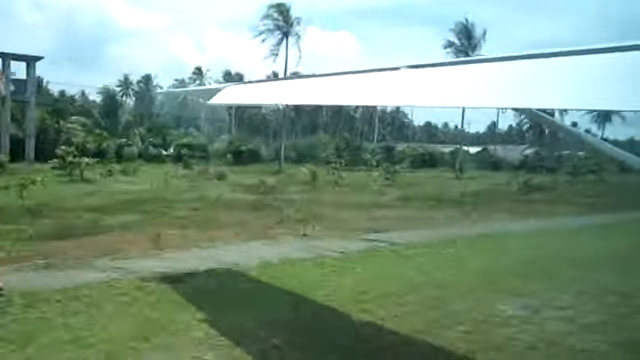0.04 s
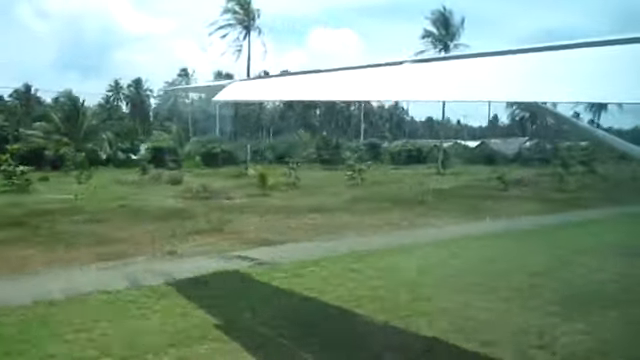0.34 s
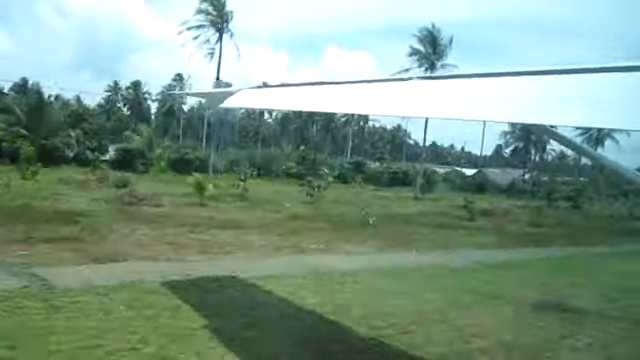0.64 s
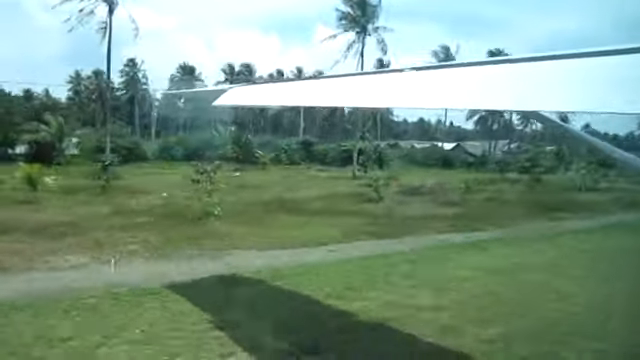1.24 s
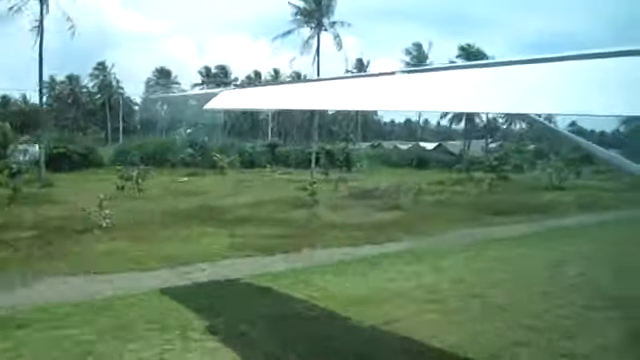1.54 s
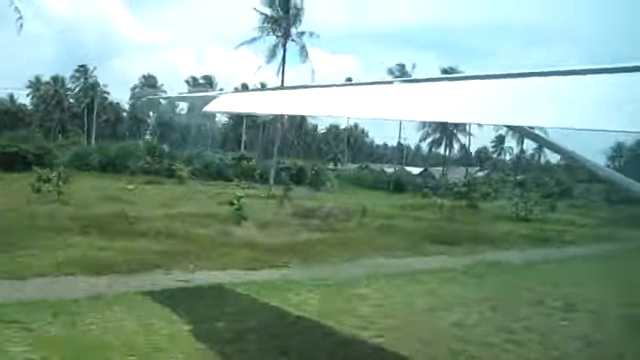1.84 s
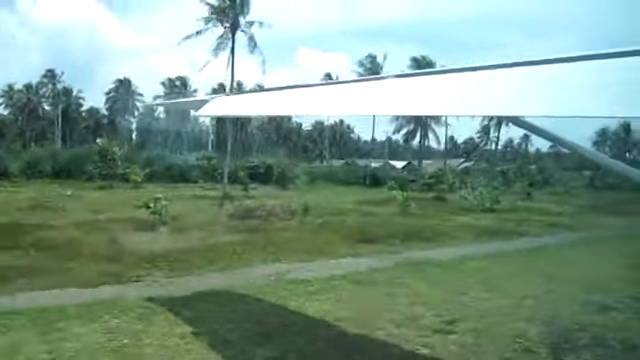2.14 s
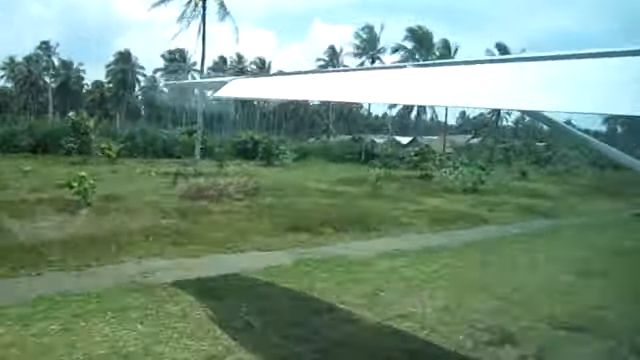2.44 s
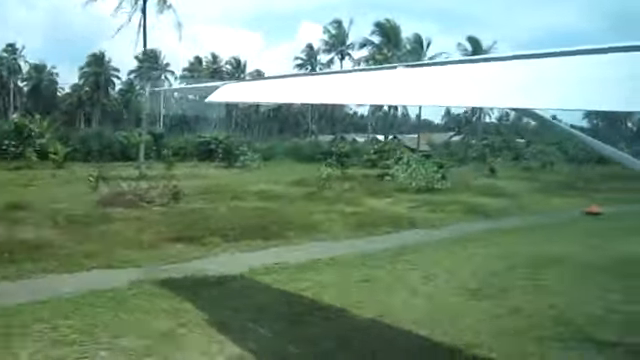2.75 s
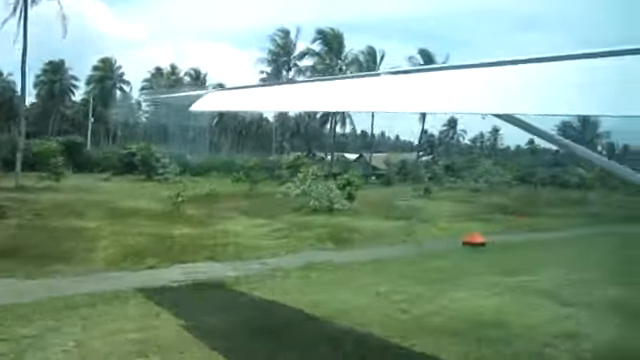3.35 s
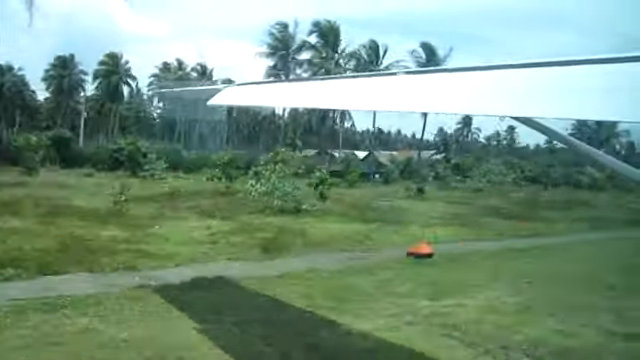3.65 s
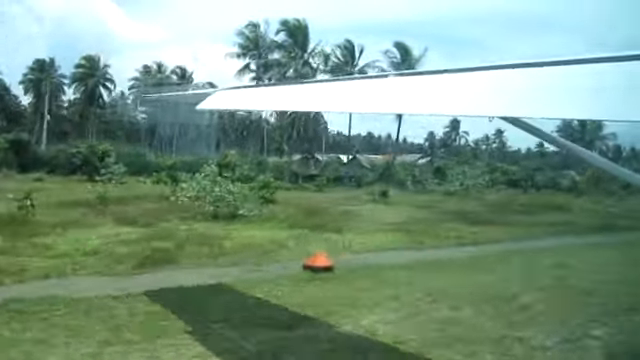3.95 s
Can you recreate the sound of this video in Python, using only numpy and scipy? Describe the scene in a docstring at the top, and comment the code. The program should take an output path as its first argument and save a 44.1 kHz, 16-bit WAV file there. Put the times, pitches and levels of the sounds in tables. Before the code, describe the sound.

Light aircraft engine drones inside the cabin, with wheel rumble, rushing air and bumps.

```python
"""Cabin of a light aircraft rolling along a grass strip after landing; one microphone at a window seat.
From the start the throttled-back piston engine drones under wheel rumble and a roar of air that rings
in the panels, with instruments whining and loose fittings chattering. A fitting squeaks, then bumps
thud through the airframe, fittings tick and rough ground shakes the panels. Near 1.9 s the hardest
bump ducks the recorder's gain, which creeps back. The drone swells at 3.7 s and falls away."""
import sys
import numpy as np
from scipy import signal
from scipy.fft import rfft, irfft
from scipy.io import wavfile
from scipy.ndimage import uniform_filter1d

SR = 44100
rng = np.random.default_rng(int(sys.argv[2]) if len(sys.argv) > 2 else 0)


def wav_record(signal):
    """Record a signal, one row per channel, as 16-bit PCM in the file named by sys.argv[1]."""
    frames = np.transpose(np.atleast_2d(signal))
    bounded = np.clip(frames, -1, 1)
    # unit amplitude maps onto the largest positive 16-bit level
    quanta = np.round(bounded * 32767).astype(np.int16)
    wavfile.write(sys.argv[1], SR, quanta)


N = 176400
PHASE_WANDER_RAD, WAVER_PER_S = 0.42, 3.4  # unsteadiness of the engine and instrument tones

# engine firing rate: time_s, rate_hz
FIRING_RATE = [(0, 61.38), (.7, 62), (1.1, 63.14), (1.5, 63.03), (2.0, 64.29), (2.5, 64.85), (3.0, 64.47),
               (3.4, 65.63), (3.7, 66.23), (4.0, 69.05)]


def from_db(db):
    """Decibels to gain."""
    return 10 ** (np.asarray(db) / 20)


def rms_one(x):
    """Scale to unit rms."""
    return x / np.sqrt(np.mean(x ** 2) + 1e-20)


def seconds():
    """The time of every sample."""
    return np.arange(N) / SR


def in_time(rows):
    """Join rows of time_s, value by straight lines."""
    return np.interp(seconds(), *np.transpose(rows))


def drift(rate):
    """Random wander of rms 1 that changes about rate times a second."""
    hz = np.arange(N + 1) * SR / (2 * N)
    slow_spectrum = rfft(rng.standard_normal(2 * N)) / (1 + (hz / rate) ** 2)
    return rms_one(irfft(slow_spectrum))[:N]


def cabin_lift_db(hz):
    """How much the cabin around the microphone raises each frequency."""
    # resonances of the cabin and its panels: centre_hz, width_hz, lift_db
    resonances = [(46.9, 5.8, 9), (66.7, 15, 4.5), (127.8, 3.3, 3), (260.6, 12, 4.5), (311.4, 6.6, 4),
                  (380, 43, 4), (889, 38, 6.5), (1036, 32, 4), (1166, 66, 3), (1424, 20, 7),
                  (1490, 28, 4.5), (1605.5, 51, 9.5), (1904, 31, 5), (2165, 97, 7), (4000, 130, 2.5),
                  (11700, 400, 2.5)]
    return sum(lift_db / (1 + (2 * (hz - centre) / width) ** 2) for centre, width, lift_db in resonances)


def cabin_noise(spectrum):
    """Noise of rms 1, shaped by rows of frequency_hz, relative_db and by the cabin's resonances."""
    hz = np.maximum(np.arange(N // 2 + 1) * SR / N, 1)
    points_hz, points_db = np.transpose(spectrum)
    db = np.interp(np.log(hz), np.log(points_hz), points_db) + cabin_lift_db(hz)
    skirts = np.minimum(hz / points_hz[0], 1) * np.minimum(points_hz[-1] / hz, 1)
    return rms_one(irfft(rfft(rng.standard_normal(N)) * from_db(db) * skirts ** 2, N))


def surges(rows, spectrum):
    """Brief bell-shaped swells of cabin noise."""
    envelope = sum(from_db(db) * np.exp(-((seconds() - middle) / half) ** 2) for middle, half, db in rows)
    return envelope * cabin_noise(spectrum)


def engine(firing_phase):
    """Wavering harmonics of the firing rate; each swells as it slides through a cabin resonance."""
    # harmonics 1 to 10: relative_db
    harmonics = [-38, -40, -41, -39, -42, -47.5, -50.5, -52, -47.5, -49.5]
    # the lower harmonics' own swells and fades, by order: time_s, gain_db
    swells = {1: [(0, -1), (.6, -2), (1.15, 7.5), (1.6, 2), (2.2, -5), (3.0, -2), (4, 0)], 2: [(0, -2),
              (1.3, -1), (2.15, 5.5), (2.8, 0), (4, -1)], 3: [(0, 0), (.25, 9.5), (.7, 6.5), (1.0, -3.5),
              (1.72, 4.5), (2.2, -11), (2.85, 4), (4, 1.5)], 4: [(0, -7), (.3, 1.5), (1.1, -9.5), (1.55, 2),
              (2.0, 6.5), (2.5, -6), (2.76, 6), (2.98, -11.5), (3.26, 5), (3.45, -5), (4, -1)], 5: [(0, 0),
              (.5, -1.5), (.78, 6.5), (1.0, 1.5), (1.8, 1.5), (2.5, -1.5), (4, 2.5)]}
    # engine effort: time_s, gain_db
    effort = [(0, 0), (.45, -1), (1.0, 1.5), (1.8, 1.5), (2.5, -0.5), (3.3, 1.5), (3.7, 4.5), (4.0, -7.5)]
    waver_db = 1.5
    drone, firing_hz = 0, in_time(FIRING_RATE)
    for order, db in enumerate(harmonics, 1):
        wander = PHASE_WANDER_RAD * drift(WAVER_PER_S)
        tone = np.sin(order * firing_phase + wander + rng.uniform(0, 2 * np.pi))
        tone = rms_one(tone * from_db(waver_db * drift(WAVER_PER_S)))
        swell_db = in_time(swells[order]) if order in swells else 0
        drone += from_db(db + swell_db + cabin_lift_db(order * firing_hz)) * tone
    return from_db(in_time(effort)) * drone


def wheels():
    """The rolling wheels rumble and their tyres roar on the grass."""
    # rumble and roar spectra: frequency_hz, relative_db
    rumble_spectrum = [(14, -12), (22, 6), (31, -10), (43, -2), (58, -2), (82, 2.5), (105, -2.5), (150, -2),
                       (190, -4.5), (280, -22), (500, -33)]
    roar_spectrum = [(100, -9), (220, 5.5), (285, 1), (350, 1), (420, -2.5), (580, -2), (740, -1.5),
                     (900, -11), (1400, -22)]
    # their loudness along the strip: time_s, relative_db
    rumble_level = [(0, -15.5), (.15, -26.5), (.27, -20), (.45, -25), (.7, -23.5), (.85, -24), (1.1, -21.5),
                    (1.5, -22.5), (1.7, -22.5), (2.15, -23), (2.5, -19.5), (2.62, -23.5), (3.1, -22),
                    (3.16, -28), (3.25, -22), (3.68, -23), (4.0, -22)]
    roar_level = [(0, -24.5), (0.2, -22.5), (0.5, -24.5), (0.77, -23.5), (1.2, -24.5), (1.5, -25),
                  (1.8, -22.5), (2.1, -27.5), (2.4, -25.5), (2.75, -26.5), (2.95, -25), (3.2, -25.5),
                  (3.5, -24), (4, -30)]
    rumble = from_db(in_time(rumble_level) - 0.5) * cabin_noise(rumble_spectrum)
    roar = from_db(in_time(roar_level) - 3.5) * cabin_noise(roar_spectrum)
    return rumble + roar


def air(firing_phase):
    """Propeller wash on the skin and hiss past doors and windows flutter and throb with the engine."""
    # wash and hiss spectra: frequency_hz, relative_db
    wash_spectrum = [(600, -6.5), (850, 0), (1100, -2), (1350, -2.5), (1650, -7), (1850, -10),
                     (2050, -13.5), (2400, -10), (2900, -22), (5000, -41)]
    hiss_spectrum = [(1200, -19), (2700, -5), (3500, 2.5), (4800, -0.5), (6300, -1.5), (8000, -7),
                     (10500, -12), (12500, -17), (15500, -26)]
    # their loudness along the strip: time_s, relative_db
    wash_level = [(0, -31.5), (0.2, -32), (0.4, -33.5), (0.8, -32), (1.15, -33.5), (1.5, -32),
                  (1.75, -30.5), (2.1, -32), (2.6, -33), (3.0, -31.5), (3.25, -30), (3.55, -31.5),
                  (3.85, -28.5), (4, -30.5)]
    hiss_level = [(0, -45), (0.15, -44), (0.36, -45.6), (0.48, -43.5), (0.7, -44.5), (0.8, -43.5),
                  (1.1, -45), (1.55, -44.5), (1.85, -43), (2.2, -45.5), (2.38, -44), (2.65, -45.5),
                  (2.9, -43.5), (3.2, -44), (3.5, -44), (3.6, -42.1), (3.7, -44), (4, -42)]
    trim_db, flutter_db, throb_depth = -3.5, 0.8, 0.028
    wash = from_db(in_time(wash_level) + trim_db) * cabin_noise(wash_spectrum)
    hiss = from_db(in_time(hiss_level) + trim_db) * cabin_noise(hiss_spectrum)
    flutter = from_db(flutter_db * drift(rate=17))
    throb = 1 + throb_depth * np.cos(firing_phase)
    return (wash + hiss) * flutter * throb


def whines():
    """Spinning instruments hold thin, slightly wavering tones."""
    # instrument tones: pitch_hz, level_db
    tones = [(1987, -56), (2632, -61.5), (3935, -72), (4337, -69), (5520, -68), (6461, -73)]
    out, waver_db = 0, 2.0
    for hz, db in tones:
        tone = np.sin(2 * np.pi * hz * seconds() + PHASE_WANDER_RAD * drift(WAVER_PER_S))
        out += from_db(db) * rms_one(tone * from_db(waver_db * drift(WAVER_PER_S)))
    return out


def whistle():
    """The air stream sings in a narrow band that comes and goes."""
    # whistle band: frequency_hz, relative_db
    spectrum = [(3750, -22), (4000, 0), (4250, -3), (4500, -13)]
    # its loudness: time_s, level_db
    level = [(0, -61), (.25, -53), (.4, -59), (.95, -59), (1.15, -61), (1.75, -56), (2.4, -57), (2.8, -58),
             (3.25, -52), (3.5, -58), (3.85, -52), (4, -55)]
    return from_db(in_time(level)) * cabin_noise(spectrum)


def rattles():
    """Loose fittings chatter faintly at random; the clear ticks add a bright snap to a duller body."""
    # clear ticks: start_s, level_db, decay_s, snap_over_body_db
    ticks = [(.772, -49, .03, -8), (.795, -48, .004, 0), (0.9883, -42, 0.0017, 1), (1.823, -49, 0.0028, -1),
             (1.894, -52, .003, 2), (2.319, -49, 0.009, -3), (2.363, -45, .012, -15),
             (2.404, -42, 0.009, -8), (2.475, -50, .02, -12), (3.154, -49, 0.022, -3),
             (3.2405, -45, 0.0026, 0), (3.435, -45, .002, 1), (3.592, -48, .004, -2),
             (3.601, -42, 0.012, -8)]
    # body and snap spectra: frequency_hz, relative_db
    body_spectrum = [(1500, -18), (3000, 10), (6000, 8), (10000, -5), (15000, -24)]
    snap_spectrum = [(5000, -10), (8000, 0), (11000, -2.5), (13500, -6), (15500, -12)]
    chatter_per_s, chatter_db, spread_db, chatter_decay_s = 70, -56, 3.5, .0015
    hits = rng.random(N) < chatter_per_s / SR
    strength = from_db(chatter_db + spread_db * rng.standard_normal(N))
    pole = np.exp(-1 / (chatter_decay_s * SR))
    body = signal.lfilter([1], [1, -pole], hits * strength + 1e-18)
    snap = 0
    for start, db, decay_s, snap_db in ticks:
        age = seconds() - start
        burst = from_db(db) * (age >= 0) * np.exp(-np.abs(age) / decay_s)
        body += burst
        snap += from_db(snap_db) * burst
    return body * cabin_noise(body_spectrum) + snap * cabin_noise(snap_spectrum)


def squeaks():
    """A fitting rubs and rings thinly."""
    # rubs: middle_s, half_length_s, level_db
    rubs = [(0.153, 0.07, -54.5), (1.76, 0.024, -55), (1.848, 0.026, -57)]
    # the fitting's ring: frequency_hz, relative_db
    spectrum = [(5800, -22), (6450, 0), (6750, 2), (7400, -18)]
    return surges(rubs, spectrum)


def bumps():
    """Each bump under the wheels sets the airframe's low modes thudding."""
    # jolts: start_s, relative_db, hardness_db_per_octave (counted from the lowest mode)
    jolts = [(0.292, -19.5, 7.5), (.797, -19, -4), (1.046, -22.5, 9), (1.913, -11, -0.5), (1.939, -12, 1.5),
             (2.413, -18, 8.5), (2.515, -24, -3), (3.666, -13.5, -15)]
    # airframe modes: pitch_hz, gain_db, t60_s
    modes = [(75.1, 4.5, 0.19), (123.7, 4.5, 0.13)]
    rise_s, lowest_hz = 0.0053, modes[0][0]
    thuds = 0
    for start, db, hardness in jolts:
        age = np.maximum(seconds() - start, 0)
        for hz, mode_db, t60 in modes:
            envelope = (1 - np.exp(-age / rise_s)) * np.exp(-np.log(1000) * age / t60)
            gain = from_db(db + mode_db + hardness * np.log2(hz / lowest_hz))
            thuds += gain * envelope * np.sin(2 * np.pi * hz * age)
    return thuds


def panel_shakes():
    """Rough ground shakes the panels in short bursts."""
    # rough patches: middle_s, half_length_s, level_db
    patches = [(.79, 0.041, -29.5), (1.87, 0.026, -29.5), (1.995, .03, -35), (2.77, 0.02, -32)]
    # shaking panels: frequency_hz, relative_db
    spectrum = [(180, 4), (300, 6.5), (700, -6), (1800, -13.5), (4000, -28)]
    return surges(patches, spectrum)


def scene():
    """Everything that reaches the microphone at the window seat, in mono."""
    firing_phase = 2 * np.pi * np.cumsum(in_time(FIRING_RATE)) / SR
    steady = engine(firing_phase) + wheels() + air(firing_phase) + whines() + whistle()
    return (steady + rattles() + squeaks() + bumps() + panel_shakes())[None]


def record(dry):
    """Loud peaks duck the recorder's gain; the sound drops out for an instant; the top is cut."""
    limit_db, recovery_db_per_s, attack_s, detector_s = -12.6, 3.3, .004, .025
    dropout_s, dropout_half_s = 1.9405, .0024  # placed at the hardest bump
    cutoff_hz = 15700
    power = uniform_filter1d(dry[0] ** 2, int(detector_s * SR))
    over_db = np.maximum(10 * np.log10(np.abs(power) + 1e-12) - limit_db, 0)
    recovery_db = recovery_db_per_s * seconds()
    held_db = np.maximum.accumulate(over_db + recovery_db) - recovery_db  # the gain creeps back
    pole = np.exp(-1 / (attack_s * SR))
    duck_db = signal.lfilter([1 - pole], [1, -pole], held_db)
    dropout = 1 - np.exp(-((seconds() - dropout_s) / dropout_half_s) ** 6)
    lowpass = signal.ellip(12, .2, 80, cutoff_hz, fs=SR, output="sos")
    return signal.sosfilt(lowpass, dry * from_db(-duck_db) * dropout)


dry = scene()
out = record(dry)
wav_record(out)
```